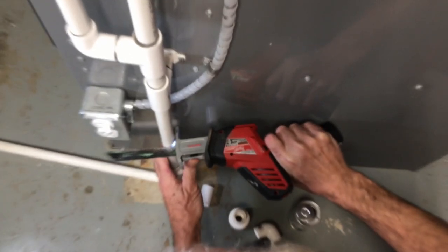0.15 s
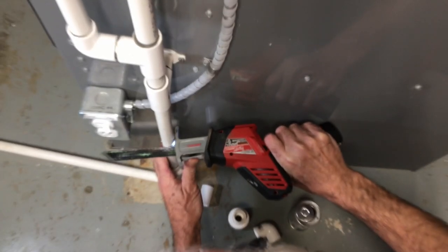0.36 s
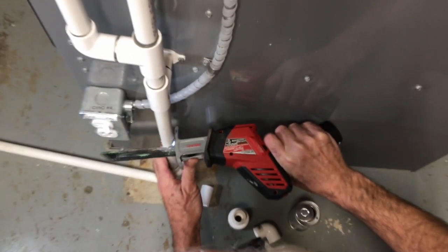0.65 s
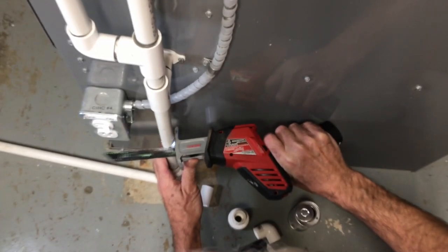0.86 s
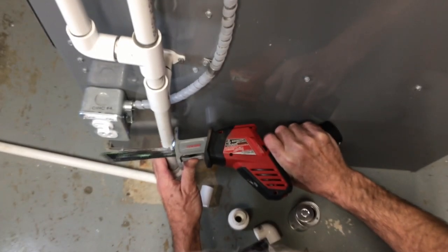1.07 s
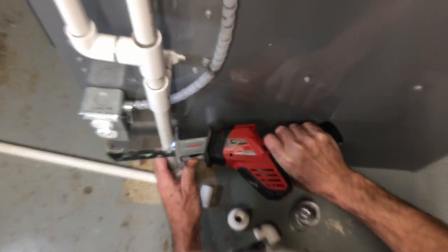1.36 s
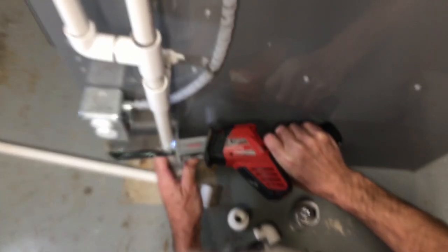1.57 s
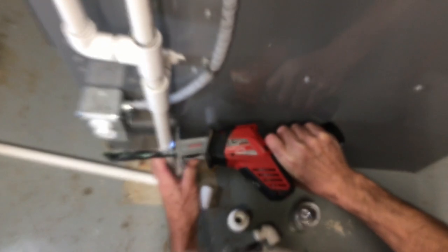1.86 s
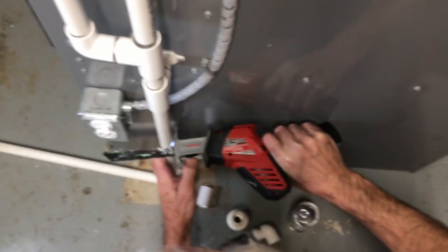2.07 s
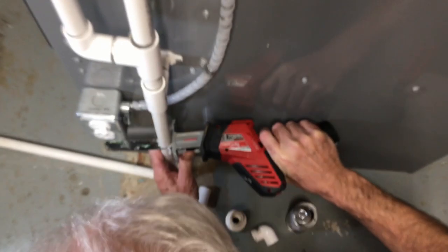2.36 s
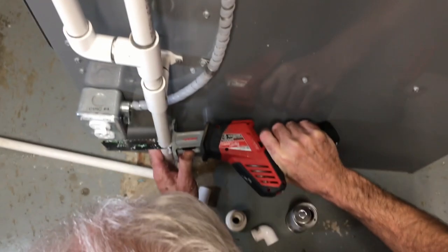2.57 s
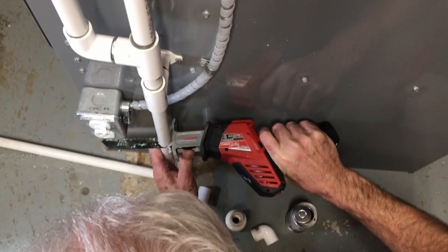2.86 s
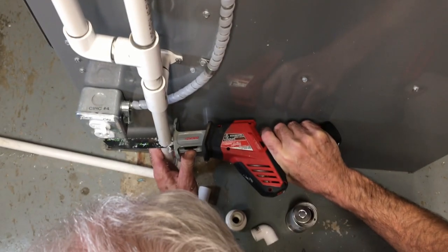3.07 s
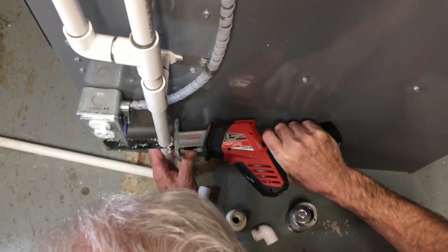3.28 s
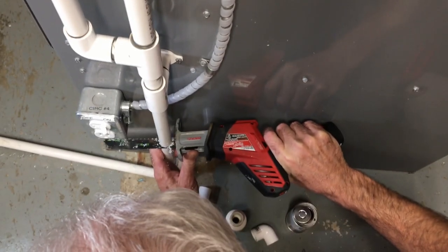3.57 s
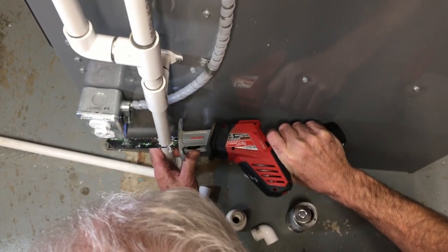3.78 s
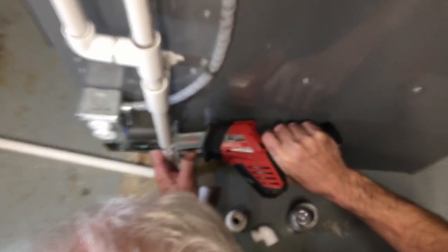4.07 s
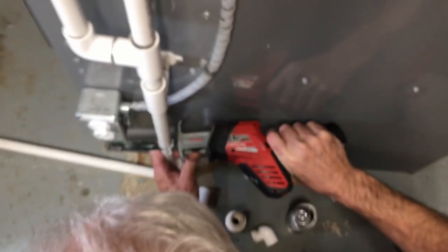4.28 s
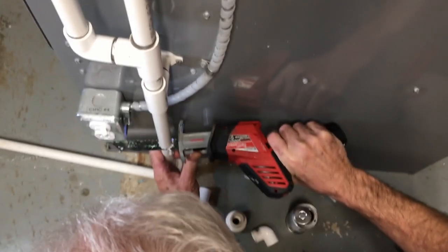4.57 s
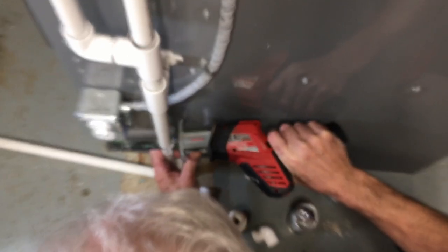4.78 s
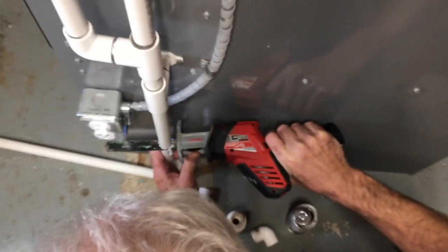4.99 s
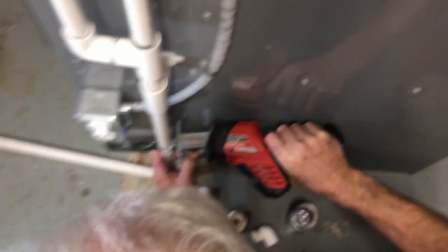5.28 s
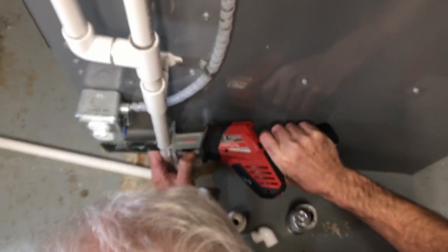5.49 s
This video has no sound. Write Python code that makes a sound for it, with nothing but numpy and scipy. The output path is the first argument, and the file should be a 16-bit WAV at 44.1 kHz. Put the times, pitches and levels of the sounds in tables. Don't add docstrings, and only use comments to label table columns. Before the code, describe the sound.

A cordless reciprocating saw is heard close up in a small, dull utility room. A faint motor whine and light buzz start it, and by 0.15 s the teeth bite: a steady, harsh grind at about seventeen strokes a second, with bright double knocks, scraping plastic and a nearby metal cabinet booming deeper as the cut goes on. Around 1.9 s sharp cracks end it; the motor stutters and coasts down by 2.1 s, leaving ticks and thin ringing metal. A loud snap and hard jab come at 2.3 s, fading by 2.55 s. Near quiet follows, with soft taps. A second, very brief jab hits at 3.3 s. Around 3.6-3.9 s hands bump the cabinet and a small fitting chatters. Short, irregular, binding cuts run 3.93-4.4, 4.6-5.0 and 5.0-5.5 s, clattering with catches and knocks; a last sharp bite at 5.53 s quickly dies away.

```python
import sys
import numpy as np
from scipy import signal
from scipy.fft import rfft, irfft, next_fast_len
from scipy.io import wavfile
from scipy.ndimage import uniform_filter1d

SR = 44100
rng = np.random.default_rng(int(sys.argv[2]) if len(sys.argv) > 2 else 0)


def inscribe(sig):
    pcm = np.round(np.clip(np.atleast_2d(sig).T, -1, 1) * 32767)
    wavfile.write(sys.argv[1], SR, pcm.astype(np.int16))


def volts_from_db(level):
    exponent = np.asarray(level, float) / 20
    return 10 ** exponent


N = 248283
t = np.arange(N) / SR
hz = np.maximum(np.fft.rfftfreq(next_fast_len(N + 8192), 1 / SR), 1)
CHANGE_S = 2.25


def rms_one(x):
    return x / np.sqrt(np.mean(x ** 2) + 1e-20)


def in_time(rows):
    s, *columns = np.transpose(rows)
    return [np.interp(t, s, c) for c in columns]


def slope(points):
    point_hz, point_db = np.transpose(points)
    return volts_from_db(np.interp(np.log(hz), np.log(point_hz), point_db))


def rings(peaks):
    return np.sqrt(sum(volts_from_db(db) ** 2 / (1 + (2 * (hz - f) / w) ** 2) for f, w, db in peaks))


def band(low_hz, high_hz):
    return 1 / np.sqrt((1 + (low_hz / hz) ** 12) * (1 + (hz / high_hz) ** 12))


def colour(x, gain):
    c = irfft(np.log(gain + 1e-7))
    c[1:len(c) // 2] *= 2
    c[len(c) // 2 + 1:] = 0
    return irfft(rfft(x, len(c)) * np.exp(rfft(c)))[:N]


def drift(rate_hz):
    r = np.exp(-2 * np.pi * rate_hz / SR)
    return rms_one(signal.lfilter([1], [1, -2 * r, r * r], rng.standard_normal(N + 9000))[9000:])


def bursts(start_s, level_db, t60_s):
    hits = np.full(N, 1e-18)
    np.add.at(hits, np.round(np.asarray(start_s) * SR).astype(int), volts_from_db(level_db))
    return signal.lfilter([1], [1, -volts_from_db(-60 / (t60_s * SR))], hits)


def peak_one(gain, t60_s):
    probe = colour(bursts([0], [0], t60_s) * rng.standard_normal(N), gain)
    return gain / (2.5 * np.sqrt(np.mean(probe[:200] ** 2)))


# start_s, turns_per_s
CRANK_SPEED = [(.12, 16.3), (.3, 17.25), (.7, 17.9), (1.3, 17.4), (1.75, 17.45), (1.92, 16.5), (1.95, 17.5)]


def crank():
    start_turns = -1.092
    return start_turns + np.cumsum(in_time(CRANK_SPEED)[0]) / SR


def passes(turns, at_turns, from_s, to_s):
    s = t[1:][np.diff(np.floor(turns - at_turns)) > 0]
    return s[(s > from_s) & (s < to_s)]


def teeth(per_s, spread_db):
    sizes = volts_from_db(spread_db * np.minimum(rng.exponential(1, N), 4)) * rng.choice([-1, 1], N)
    impacts = sizes * (rng.random(N) < per_s / SR)
    return rms_one(impacts) + rng.standard_normal(N)


def repeating(turns, alike):
    fresh = rng.standard_normal((130, 2520))
    pattern = signal.lfilter([np.sqrt(1 - alike ** 2)], [1, -alike], fresh, axis=0)
    looped = pattern[(turns + 20).astype(int), (turns % 1 * 2520).astype(int)]
    return np.where(t < CHANGE_S, looped, (looped + rng.standard_normal(N)) / np.sqrt(2))


def ring_on(level_db, db_per_s):
    return np.maximum.accumulate(level_db + db_per_s * t) - db_per_s * t


# start_s, effort_db
PULLS = [
    [(0, -49), (.047, -50), (.053, -44.5), (.075, -47), (.11, -43), (.125, -36), (.16, -33.5),
     (1.87, -33.5), (1.94, -38.5), (1.99, -34.5), (2.05, -47), (2.11, -71), (2.2, -75), (2.28, -85)],
    [(2.317, -28), (2.39, -32), (2.405, -39.5), (2.42, -36.5), (2.45, -41), (2.475, -49), (2.52, -60.5),
     (2.54, -75), (2.58, -97)],
    [(3.31, -33.5), (3.334, -47), (3.375, -55), (3.4, -67), (3.46, -94)],
    [(3.93, -45), (3.945, -48), (3.965, -42), (4.0, -30), (4.06, -28), (4.31, -37), (4.345, -44.5),
     (4.385, -57), (4.42, -69), (4.46, -93)],
    [(4.616, -37.5), (4.65, -34), (4.71, -28), (4.906, -35.5), (4.995, -51.5)],
    [(5.006, -40.5), (5.04, -48), (5.15, -32.5), (5.3, -32), (5.44, -34), (5.518, -46.5)],
    [(5.53, -30), (5.555, -46), (5.605, -58), (5.615, -50), (5.63, -45)],
]
# cabinet_db, pipe_db
GRIP = [(2, -0.5), (1.5, -1), (-1.5, -3), (0, -0.5), (1, -2), (0, 0), (-0.5, -5.5)]
# effort_db, cabinet_db, pipe_db, hiss_db
ANSWER = [(-120, -120, -120, -120), (-85.5, -69.5, -90, -98), (-71, -42.5, -52, -81),
          (-47, -39.5, -43.5, -53), (-40, -34, -37, -41.5), (-35, -32.5, -32, -38),
          (-26.5, -30, -30.5, -24.5)]
# start_s, level_db
CABINET_DEPTH = [(0, -8.5), (.14, -12.5), (.45, -10.5), (.55, -6.5), (1.35, -5.5), (1.48, -0.5),
                 (1.7, -2.5), (1.8, 0.5), (2.1, -0.5)]
# start_s, level_db
PIPE_DEPTH = [(0, 1), (.3, 0.5), (.9, -1.5), (1.3, 0), (1.5, -0.5), (1.75, 2.5), (2.1, 0.5)]
# start_s, level_db
BUMPS = [(3.28, -49), (3.595, -50), (3.709, -44.5), (3.79, -66), (4.53, -44), (4.575, -53)]


def effort():
    blade, lean = np.full(N, -120.), np.zeros((2, N))
    for pull, grip in zip(PULLS, GRIP):
        begun = t >= pull[0][0]
        released = (pull[-1][0] + .05, -120)
        lean = np.where(begun, np.c_[list(grip)], lean)
        blade = np.where(begun, in_time(pull + [released])[0], blade)
    efforts, *answers = np.transpose(ANSWER)
    cabinet, pipe, hiss = [np.interp(blade, np.sort(efforts), a) for a in answers]
    cabinet = cabinet + in_time(CABINET_DEPTH)[0] + lean[0]
    idle_db = -7 * (t < 0.154)
    pipe = pipe + in_time(PIPE_DEPTH)[0] + lean[1] + idle_db
    for s, bump_db in BUMPS:
        cabinet = np.where((t >= s) & (t < s + .02), np.maximum(cabinet, bump_db), cabinet)
    s, bump_db = BUMPS[2]
    pipe = np.where((t > s) & (t < s + 0.076), bump_db - 29, pipe)
    build_s = 0.022
    r = np.exp(-1 / (build_s * SR))
    cabinet = 10 * np.log10(signal.lfilter([1 - r], [1, -r], volts_from_db(cabinet) ** 2) + 1e-14)
    settle_s, settle_db, settle_db_per_s = 2.08, -63, 66.5
    settling = (t > settle_s) & (t < PULLS[1][0][0])
    settle = np.where(settling, settle_db - settle_db_per_s * (t - settle_s), -120)
    return [ring_on(cabinet, 69), ring_on(pipe, 220), blade, np.maximum(hiss, settle)]


# ring_hz, width_hz, level_db
BLADE_RING = [(3700, 120, -1), (3790, 120, 0), (3900, 140, -.5)]


def blade_song(turns):
    strike_turns, fade_db = .44, 15
    fall_db = uniform_filter1d(-fade_db * ((turns - strike_turns) % 1), size=250)
    pull = repeating(turns, alike=.65) * volts_from_db(fall_db)
    return volts_from_db(-5.5) * rms_one(colour(pull, rings(BLADE_RING) ** 2))


# ring_hz, width_hz, level_db
BINDING_RINGS = [(2130, 120, -19.5), (3850, 230, -15), (4620, 450, -9)]


def binding():
    out = np.zeros(N)
    for ring_hz, width_hz, level_db in BINDING_RINGS:
        fits = rng.standard_normal(N) * volts_from_db(4.5 * drift(60))
        out += volts_from_db(level_db) * rms_one(colour(fits, rings([(ring_hz, width_hz, 0)]) ** 2))
    return out


# point_hz, density_db_per_hz
LONG_CUT = [(15, -37), (25, -31.5), (157, -2.5), (301, -9.5), (384, -23.5), (560, 4), (607, -3), (936, 0.5),
            (1190, -23), (1940, -30.5), (3160, -22.5), (3820, -15), (6920, -17.5), (9300, -17.5),
            (11300, -16.5), (16000, -18.5)]
SHORT_CUT = [(15, -47), (25, -16.5), (87, -4.5), (166, -4.5), (249, 12), (363, -5.5), (560, -5),
             (796, -9.5), (1520, -17.5), (2050, 0), (2410, -51), (3820, -9), (5730, -15.5), (12200, -12),
             (16000, -23.5)]
# ring_hz, width_hz, level_db
LONG_RINGS = [(159, 15, 0), (321.4, 34, 1), (431.7, 17, 2), (554.4, 34, 6), (782, 24, 3.5), (970, 120, -1),
              (1260, 10, 0), (1643, 270, -8), (1954, 230, -8), (2565, 340, -10.5), (4950, 53, -8),
              (5400, 63, -8), (5500, 60, -11), (5500, 500, -13), (10900, 1500, -6.5), (13400, 760, -10)]
SHORT_RINGS = [(171, 37, 17), (584, 110, 11), (808, 210, 7.5), (1254, 6.3, 9), (1436, 17, -1.5),
               (2840, 280, -5.5), (5270, 39, -3), (6870, 290, -7), (10000, 820, -9.5)]
# ring_hz, width_hz, level_db
COASTING = [(1570, 200, 3), (4330, 550, -6), (2950, 350, -2)]
# ring_hz, width_hz, level_db
SETTLING = [(6300, 500, 0.5), (7900, 500, -0.5), (11200, 900, -4.5)]
# point_hz, density_db_per_hz
CABINET_TAIL = [(15, -36), (25, 0.5), (48, -3.5), (81, 1), (146, 4.5), (204, -4), (400, -32), (520, -61),
                (880, -120)]


def cutting(turns):
    levels = effort()
    cabinet_db, pipe_db, blade_db, hiss_db = levels
    long_cut = t < CHANGE_S
    steady = np.where(long_cut, 1, .4)

    def swell(db, per_turn, at_turns):
        return steady * db * np.cos(2 * np.pi * per_turn * (turns - at_turns))

    strokes_db = [swell(0.98, 1.8, 0.037) + drift(26),
                  swell(0.84, 0.94, 0.33) + 0.6 * drift(29),
                  swell(1.1, 0.99, 0.48) + 1.1 * drift(75),
                  swell(0.94, 0.94, 0.33) + 1.4 * drift(99)]
    drives = [repeating(turns, alike=.6), repeating(turns, alike=.45),
              teeth(per_s=5000, spread_db=5.5), teeth(per_s=28000, spread_db=5.0)]
    edges_hz = [28, 350, 1150, 6500, 15600]
    sounds = []
    for drive, stroke_db, low_hz, high_hz in zip(drives, strokes_db, edges_hz, edges_hz[1:]):
        cuts = []
        for smooth, peaks in ((LONG_CUT, LONG_RINGS), (SHORT_CUT, SHORT_RINGS)):
            body = np.hypot(volts_from_db(2.5) * slope(smooth), rings(peaks)) * band(low_hz, high_hz)
            cuts.append(rms_one(colour(drive * volts_from_db(stroke_db), body)))
        sounds.append(np.where(long_cut, *cuts))
    cabinet, pipe, blade, hiss = sounds

    loaded = 1 / (1 + volts_from_db(-52 - blade_db))
    blade = blade + np.where(long_cut, blade_song(turns), binding()) * loaded

    moving = np.where(t < 2.3, 1 / (1 + volts_from_db(-64 - hiss_db) ** 2), 1)
    coast = rms_one(colour(drives[2], rings(COASTING) ** 2.1 + .03 * band(1150, 6535)))
    settle = rms_one(colour(drives[3], rings(SETTLING) + .1 * band(6000, 12500)))
    blade = np.sqrt(moving) * blade + np.sqrt(1 - moving) * coast
    hiss = np.sqrt(moving) * hiss + np.sqrt(1 - moving) * settle

    driven = 1 / (1 + volts_from_db(cabinet_db - pipe_db - 10.5) ** 2) / (1 + volts_from_db(-105 - blade_db) ** 2)
    tail = rms_one(colour(rng.standard_normal(N), slope(CABINET_TAIL) * band(26, 330)))
    cabinet = np.sqrt(driven) * cabinet + np.sqrt(1 - driven) * tail

    gains = [np.sqrt(np.maximum(volts_from_db(level_db) ** 2 - volts_from_db(-84) ** 2, 0)) for level_db in levels]
    return sum(gain * sound for gain, sound in zip(gains, (cabinet, pipe, blade, hiss)))


# start_s, end_s, whine_db, current_on_share
HOLDS = [(0, .085, -54.5, .11), (.085, .16, -56, .4), (.16, 1.9, -52, .44), (1.93, 2.02, -60, .11),
         (2.02, 2.078, -55, .1), (3.32, 3.365, -55, .36), (3.365, 3.383, -58, .2), (3.383, 3.415, -73, .14),
         (3.918, 3.93, -54, .13), (3.93, 3.975, -52, .3), (4.945, 5.004, -51, .11),
         (5.004, 5.037, -48.5, .12), (5.037, 5.1, -54, .3), (5.12, 5.5, -54, .16), (5.608, 5.7, -55, .15)]


def trigger():
    level_db, share = np.full(N, -99.), np.zeros(N)
    for start_s, end_s, hold_db, on in HOLDS:
        fade_db_per_s = 140 if on > .2 else 900
        held_db = np.maximum(hold_db - fade_db_per_s * np.maximum(t - end_s, 0), -99)
        level_db = np.where(t >= start_s, held_db, level_db)
        share = np.where(t >= start_s, on, share)
    return [uniform_filter1d(c, size=300) for c in (level_db, share)]


WHINE_DB = [-8, 2.7, -.5, -14, -11, -9, -8]


def whine():
    chop_hz = 1997
    level_db, share = trigger()
    phase = 2 * np.pi * np.cumsum(chop_hz + .7 * drift(5)) / SR
    lines = np.zeros(N)
    for k, db in enumerate(WHINE_DB, 1):
        lines += volts_from_db(db + 1.2 * drift(25)) * np.sin(np.pi * k * share) * np.sin(k * phase + k * k)
    return np.sqrt(2) * volts_from_db(level_db) * lines * (level_db > -95)


# point_hz, density_db_per_hz
ROOM_TONE = [(15, -33), (25, 3), (180, 1.5), (384, -13.5), (695, -9), (1160, -26.5), (1890, -23.5),
             (3820, -27), (7510, -23.5), (13600, -26), (16000, -30)]


def room_tone():
    air = colour(rng.standard_normal(N), slope(ROOM_TONE) * band(20, 13700) ** 3)
    return volts_from_db(-71.5 + 1.5 * drift(4)) * rms_one(air)


# start_s, peak_db, ring_hz, thump_re_peak_db
SNAPS = [(1.8935, -23.5, 5990, 0.5), (3.9669, -22, 6950, -33), (5.0838, -21.5, 9400, -14),
         (2.3155, -9.5, 2050, -9.5), (2.4533, -20.5, 1980, -4), (3.3082, -18.5, 3100, -2),
         (3.3085, -19, 1910, -7), (3.3134, -44.5, 1970, -19), (3.9268, -20, 1990, -14),
         (4.6134, -14.5, 3000, -8), (5.012, -34, 1810, -32)]
TICKS = [(2.0744, -42, 5330, -14), (2.149, -54.5, 6800, 5), (2.1879, -57, 8170, 8.5),
         (3.334, -42.5, 5050, -9.5), (3.3792, -35, 4070, -21), (3.805, -47.5, 6300, 5.5),
         (3.8981, -53, 2950, -5), (4.5911, -42.5, 2850, -1)]
TAPS = [(0.055, -39.5, 4000, 4), (2.513, -41.5, 2030, 1.5), (5.582, -40.5, 3870, -22.5),
        (2.829, -81, 1500, 3), (3.0794, -72.5, 1880, 5), (3.4188, -62, 1800, 19.5), (4, -68, 1960, 3),
        (3.616, -58.5, 1710, 9), (3.598, -53, 2000, -2), (3.1, -79, 902, 16), (4.396, -45.5, 2000, 2),
        (4.376, -46, 2040, -5), (5.6155, -35.5, 1900, -4)]
CRACKS = [(1.9009, -11.5, 4160, -13.5), (1.9075, -10, 7560, -8.5), (5.003, -19.5, 1800, -25),
          (5.1826, -12.5, 10400, -29), (5.5268, -16, 3000, -3.5), (5.5335, -22, 9300, -17),
          (5.074, -28, 11000, -15), (3.9, -67, 5000, 0), (4.803, -18, 1950, -2), (5.249, -18.5, 2650, 0),
          (2, -54, 4400, -2), (3.269, -49, 5400, -5), (4.1, -52, 6700, 2), (4.5436, -53, 4300, -2),
          (2.117, -53, 4400, -10), (2.2696, -60, 12000, -22), (4.418, -57.5, 2040, 0),
          (2.3, -58.5, 9000, -6), (0.063, -34, 1800, 1.5), (5.6155, -33, 2050, -7), (3.4188, -64, 8000, 10),
          (1.2955, -19, 3860, -7)]
# ring_hz, width_hz, level_db
HOUSING = [(1250, 90, -13.5), (1660, 100, -2), (2025, 90, 2.5), (2680, 160, -0.5), (3100, 120, -2.5),
           (3518, 110, -0.5), (4150, 220, -10.5)]
# ring_hz, width_hz, level_db
SWITCH = [(6430, 66, 1.5), (7100, 230, -2), (8100, 390, 1), (10100, 770, 2.5), (13000, 2800, -2.5)]


def clicks():
    kinds = ((SNAPS, 0, 0.02), (TICKS, -1.9, 0.018), (TAPS, -20, 0.035), (CRACKS, 1.5, 0.011))
    housing, thump, switch, own = parts = np.zeros((4, N))
    tail = np.arange(4000) / SR
    r = np.exp(-np.pi * 110 / SR)
    for rows, top_db, t60_s in kinds:
        for start_s, peak_db, ring_hz, thump_db in rows:
            at = round(start_s * SR)
            crack = volts_from_db(peak_db - 60 * tail / max(t60_s, .004)) * rng.standard_normal(len(tail))
            crack[60] += 3.6 * volts_from_db(peak_db)
            crack = (crack * np.minimum(tail / min(0.0027, t60_s / 7), 1))[:N - at]
            pole = [1, -2 * r * np.cos(2 * np.pi * ring_hz / SR), r * r]
            ring = signal.lfilter([1, 0, -1], pole, crack)
            parts[:, at:at + len(crack)] += [crack, volts_from_db(thump_db) * crack, volts_from_db(top_db) * crack,
                                             volts_from_db(-25.5) * ring]
    housing_gain = (rings(HOUSING) ** 1.4 + .06) * band(1050, 5900)
    pipe_gain = rings([(556, 160, 1.1), (724, 89, -0.5), (955, 190, 1.3)]) * band(450, 1080)
    switch_gain = rings(SWITCH) * band(5500, 16400)
    return (volts_from_db(-5) * colour(housing, peak_one(housing_gain, 0.016))
            + volts_from_db(1.5) * colour(thump, peak_one(pipe_gain, 0.016))
            + volts_from_db(-3) * colour(switch, peak_one(switch_gain, 0.016)) + own)


def room(x):
    t60_s = .2
    tail = rng.standard_normal(9000) * volts_from_db(-60 * np.arange(9000) / SR / t60_s)
    tail = signal.lfilter([1], [1, -.75], tail)
    echo = np.r_[np.zeros(200), tail / np.sqrt(np.sum(tail ** 2))]
    return signal.fftconvolve(x, echo)[:N]


# angle_turns, knock_db
TURNING_POINTS = [
    (0.44, -21.5),
    (0.938, -21.5),
]
# start_s, peak_db
LOOSE_KNOCKS = [(0.1236, -39), (1.2925, -24), (1.9567, -24), (1.9789, -36), (2.0076, -21.5), (2.026, -31),
                (3.9673, -32), (3.999, -33), (4.0634, -27), (4.1044, -18), (4.1967, -19), (4.237, -21.5),
                (4.269, -24), (4.3071, -34), (4.6543, -41), (4.673, -19), (4.8638, -23), (4.8978, -22),
                (2.4082, -20), (2.327, -22.5), (2.362, -22), (4.9533, -26.5), (5.0853, -21.5), (5.126, -21),
                (5.1622, -28), (5.2415, -22), (5.2945, -20), (5.3144, -38), (5.341, -20.5), (5.3693, -20.5),
                (5.3978, -24), (5.4318, -18.5), (5.476, -23.5)]
# ring_hz, width_hz, level_db
KNOCK = [(7900, 5300, -3), (11160, 1900, 7.5), (12500, 2000, 1.5), (12400, 2500, -3), (14400, 1200, -18)]


def knocks(turns):
    times, levels = [list(c) for c in np.transpose(LOOSE_KNOCKS)]
    for at_turns, knock_db in TURNING_POINTS:
        s = passes(turns, at_turns, .11, 1.89)
        times += list(s + rng.normal(0, 0.0001, len(s)))
        levels += list(knock_db + rng.normal(0, 0.6, len(s)))
    shape = bursts(times, levels, 0.024)
    return colour(shape * rng.standard_normal(N), peak_one(rings(KNOCK) + .05, .025))


def slaps(turns):
    s = passes(turns, .5 + .004, .2, 1.88)
    shape = bursts(s, -30 + rng.normal(0, 3.5, len(s)), .018)
    return colour(shape * rng.standard_normal(N), peak_one(band(1500, 9500) + .05, .02))


# [(mode_hz, peak_db)]
RUNG = [(2.6585, 0.044, [(857, -46), (720, -55), (3950, -64), (2700, -73)]), (2.8292, 0.045, [(827, -59.5),
        (645, -66)]), (3.269, 0.038, [(800, -45), (2500, -54), (3850, -49), (6200, -52)]),
        (3.712, 0.34, [(570, -58)]), (3.595, 0.066, [(571, -51), (770, -48), (974, -51), (1200, -51),
        (1430, -51.5), (1700, -56), (2030, -47), (2670, -58), (3020, -58.5), (3570, -57)]),
        (3.8049, 0.042, [(581, -54.5), (910, -55), (2510, -59.5), (2980, -58), (4110, -51), (4960, -65),
        (6260, -58), (6940, -58)]), (3.8987, 0.034, [(880, -50.5), (1450, -61.5), (2000, -56), (2850, -55),
        (3700, -54), (4200, -58)]), (2.1474, .2, [(7890, -66), (6680, -70), (11400, -72)]),
        (2.1878, .35, [(6360, -61.5), (6880, -67.5), (7780, -61.5), (11100, -65.5)]),
        (2.285, .9, [(13500, -78), (15000, -82)]), (3.775, .5, [(4100, -75)]), (3.348, 0.12, [(2000, -45)]),
        (3.925, 0.045, [(600, -50), (900, -44), (1300, -35)]), (4.5433, 0.084, [(850, -51), (2020, -47.5),
        (3080, -59.5), (4320, -52)])]


def rung():
    out, tail = np.zeros(N), np.arange(6000) / SR
    split_hz, partials = 70, 4
    rise = np.minimum(tail / 0.00095, 1)
    for start_s, t60_s, modes in RUNG:
        at = round(start_s * SR)
        for mode_hz, peak_db in modes:
            fall = tail / max(t60_s * np.sqrt(900 / mode_hz), .006)
            cluster_hz = mode_hz + split_hz * np.sqrt(mode_hz / 900) * rng.uniform(-1.3, 1, partials)
            cycles = cluster_hz * tail[:, None] + rng.random(partials)
            wave = np.sin(2 * np.pi * cycles).sum(axis=1)
            decay = volts_from_db(-60 * fall) + 0.083 * volts_from_db(-17 * fall)
            out[at:at + len(tail)] += volts_from_db(peak_db - 3.5) * wave * decay * rise
    return out


# start_s, end_s, level_db
RUBS = [(2.28, 2.315, -76), (4.537, 4.585, -72), (3.267, 3.314, -59.5), (3.71, 3.863, -78),
        (3.896, 3.93, -62), (4.585, 4.616, -61)]
# point_hz, density_db_per_hz
RUB = [(500, -5), (800, 5.5), (1300, -16.5), (2500, -10.5), (4000, -13), (6500, -14.5), (14000, -19.5)]


def rubs():
    gain = sum(volts_from_db(db) * ((t > start_s) & (t < end_s)) for start_s, end_s, db in RUBS)
    grain = rms_one(colour(teeth(per_s=5000, spread_db=1.5), slope(RUB) * band(450, 15000)))
    return uniform_filter1d(gain, size=200) * grain


# start_s, pipe_peak_db, housing_re_pipe_db, blade_re_pipe_db
CATCHES = [(2.326, -20, -12, -6), (2.342, -26, -8, 2), (2.361, -33, -3, -2), (2.384, -26, -12, -19),
           (2.411, -20, -15.5, -7), (3.982, -16, -21, -15), (4.002, -15, -24, -5.5),
           (4.021, -13.5, -24, -4.5), (4.061, -14, -13, 0), (4.112, -24, -14, -11), (4.126, -15, -26, -14),
           (4.159, -33, -15, -6), (4.197, -15, -21, -8), (4.243, -15, -21, -26), (4.269, -22, -17, -22),
           (4.306, -36, -7, -15), (4.349, -22.5, -29, -34), (4.672, -15, -23, -5), (4.7, -18, -9, -6),
           (4.724, -28, -3, 11), (4.748, -26, -0.5, -10), (4.781, -22, -10, -12), (4.8, -22, -13, -21),
           (4.824, -16, -26, -25), (4.86, -21, -18, -10), (4.898, -18, -16.5, -25), (5.067, -29, -3, 0),
           (5.082, -26, -10, -11), (5.126, -25, -10, -7), (5.161, -22, -13, -4), (5.186, -22, -27.5, -23),
           (5.202, -12, -24, -7), (5.247, -14.5, -15, -10), (5.267, -19, -16, -8), (5.299, -14, -21, -6),
           (5.344, -18.5, -14, -1), (5.365, -25, -12, -9), (5.405, -31, -17, -1), (5.43, -20, -19, -1),
           (5.449, -25, -12, -12), (5.474, -26.5, -3, -1), (5.502, -22, -34, -18)]
# [(ring_hz, width_hz, level_db)], body_db, t60_s
CAUGHT = [
    ([(570, 40, -1), (665, 83, -3.5), (807, 71, -1), (916, 78, -4.5)], -5.5, 0.036),
    ([(2067, 78, -0.5)], 0, 0.019),
    ([(3750, 260, 1.5), (4000, 300, -1), (4700, 500, -3)], -4, 0.019),
]


def catches():
    start_s, pipe_db, *others_db = np.transpose(CATCHES)
    out = np.zeros(N)
    for re_db, (body, body_db, t60_s) in zip([0, *others_db], CAUGHT):
        shape = uniform_filter1d(bursts(start_s, pipe_db + re_db + body_db, t60_s), size=200)
        out += colour(shape * rng.standard_normal(N), peak_one(rings(body) ** 2, t60_s))
    return out


# start_s, peak_db
RATTLE = [(3.7085, -47), (3.727, -44), (3.7344, -62), (3.7444, -52), (3.7544, -66.5), (3.7614, -53.5),
          (3.7744, -55), (3.7844, -62)]
# ring_hz, width_hz, level_db
FITTING = [(6300, 150, -19), (7420, 180, -2), (8760, 220, -6), (10500, 200, -18)]


def rattle():
    start_s, peak_db = np.transpose(RATTLE)
    shape = bursts(start_s, peak_db - 9.5, 0.038)
    return colour(shape * rng.standard_normal(N), peak_one(rings(FITTING), 0.018))


def scene():
    turns = crank()
    hits = clicks() + knocks(turns) + slaps(turns) + rung() + rattle()
    saw = cutting(turns) + whine() + catches()
    return (saw + rubs() + hits + volts_from_db(-21) * room(hits) + room_tone())[None]


def band_limit(x):
    return signal.sosfilt(signal.butter(12, 16980, fs=SR, output="sos"), x)


def record(dry):
    edge = signal.cheby2(14, 38, 16150, fs=SR, output="sos")
    mix = signal.sosfilt(edge, dry)
    return band_limit(mix)


dry = scene()
out = record(dry)
inscribe(out)
```